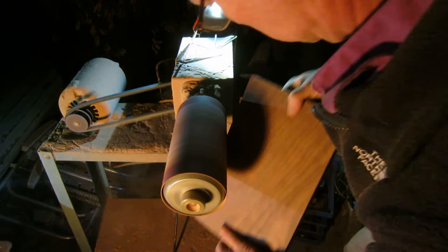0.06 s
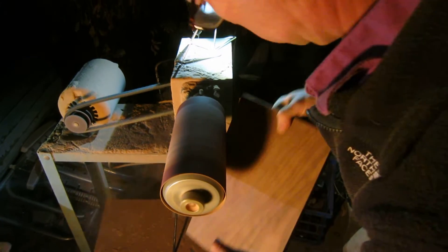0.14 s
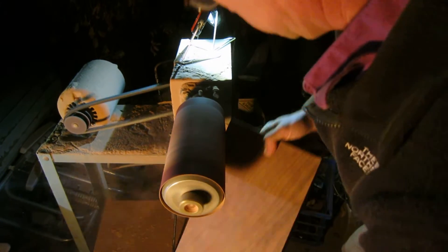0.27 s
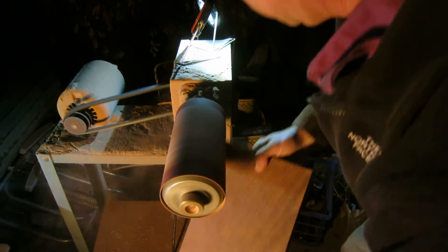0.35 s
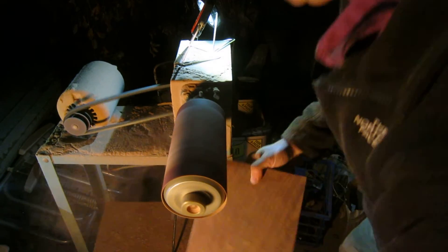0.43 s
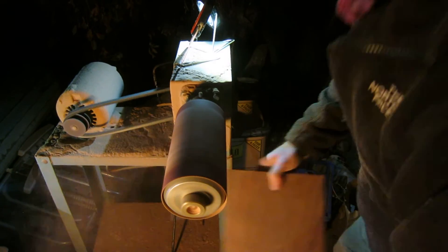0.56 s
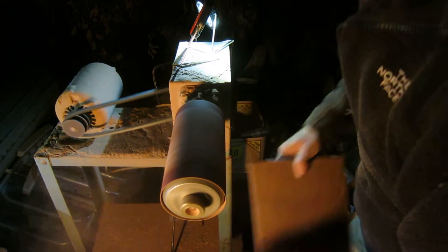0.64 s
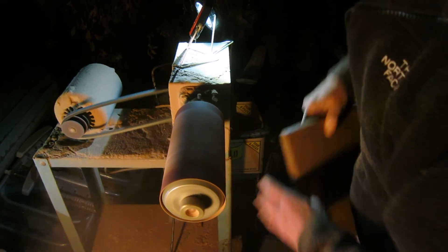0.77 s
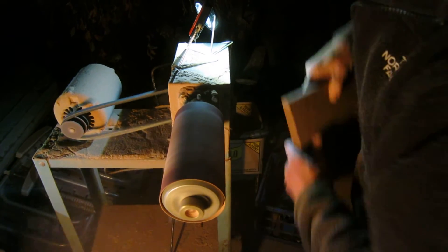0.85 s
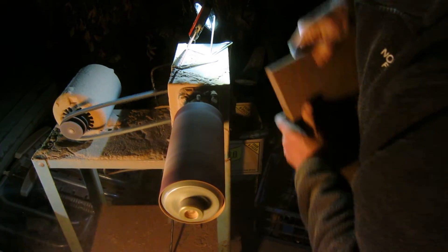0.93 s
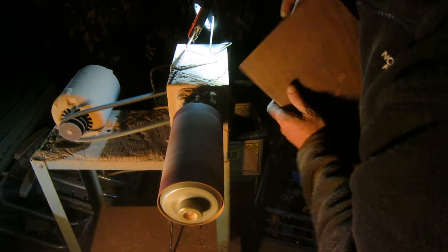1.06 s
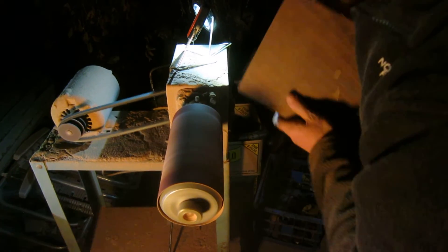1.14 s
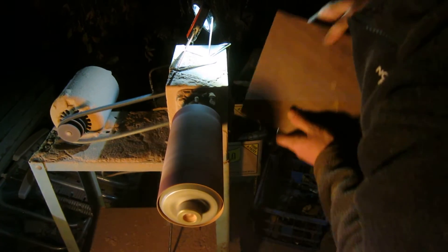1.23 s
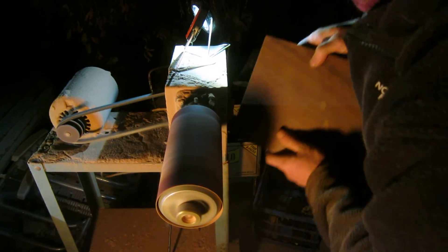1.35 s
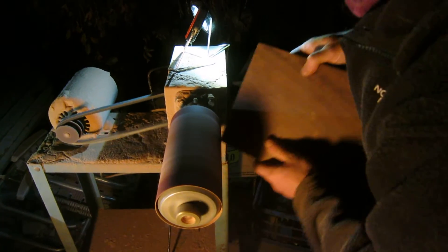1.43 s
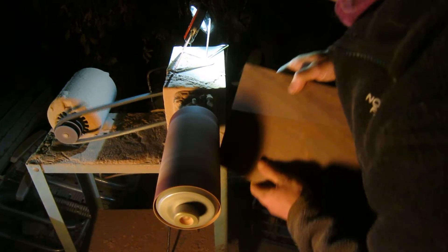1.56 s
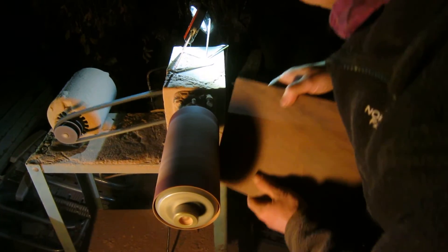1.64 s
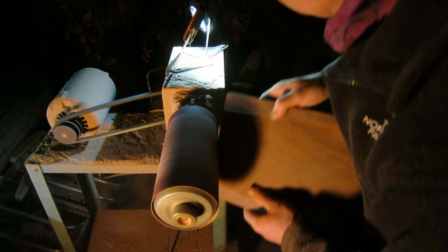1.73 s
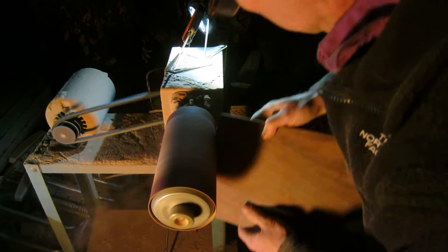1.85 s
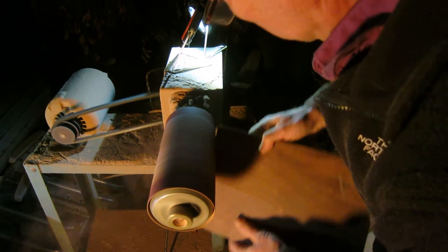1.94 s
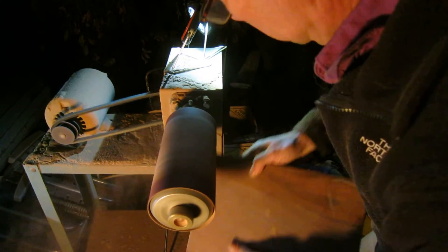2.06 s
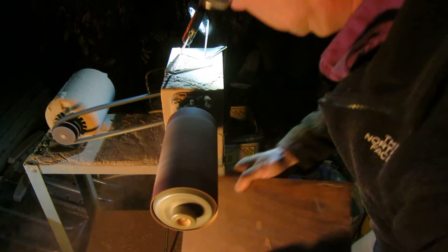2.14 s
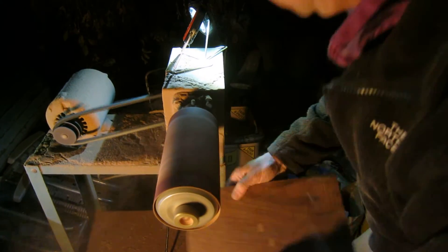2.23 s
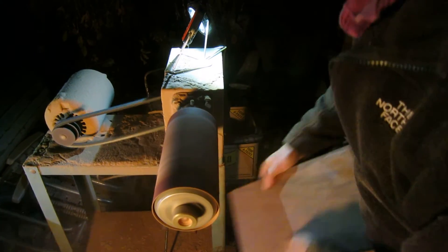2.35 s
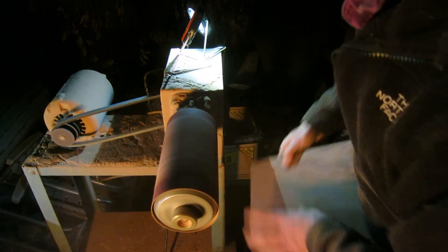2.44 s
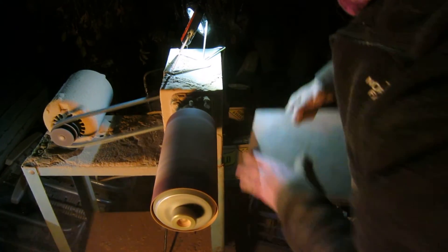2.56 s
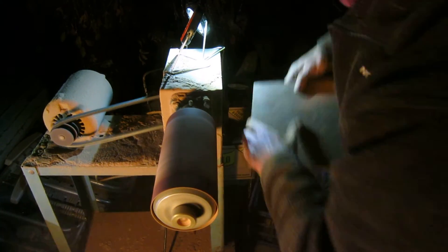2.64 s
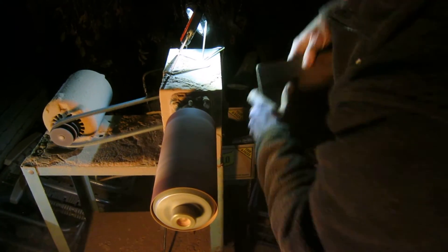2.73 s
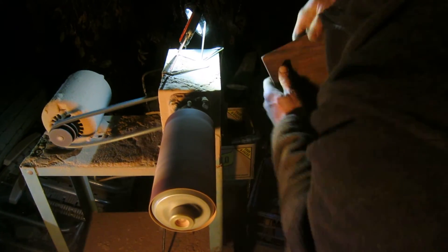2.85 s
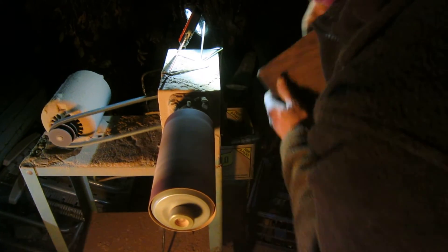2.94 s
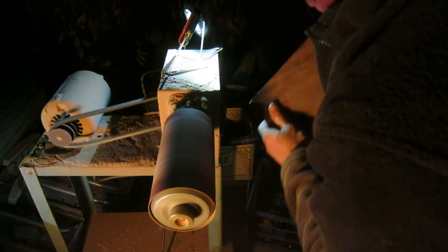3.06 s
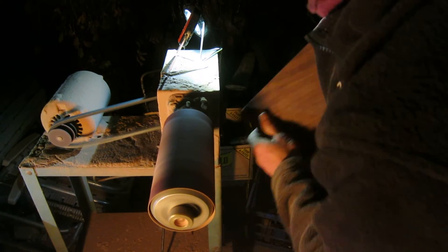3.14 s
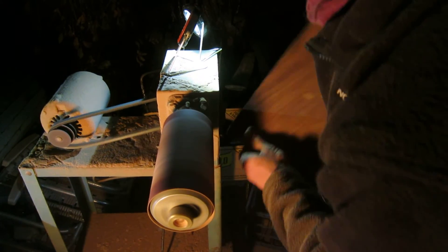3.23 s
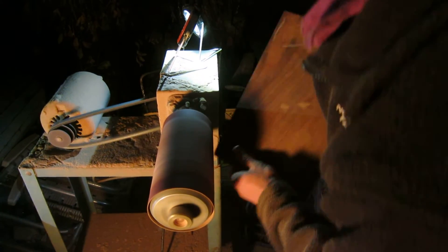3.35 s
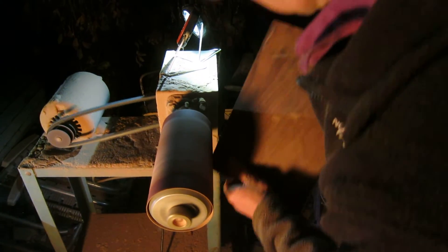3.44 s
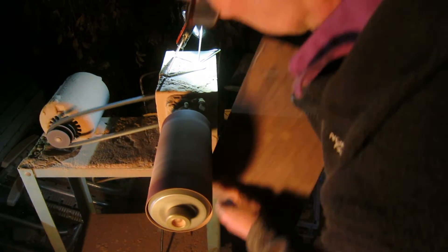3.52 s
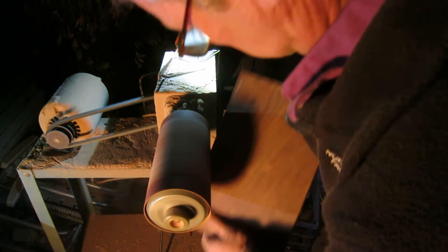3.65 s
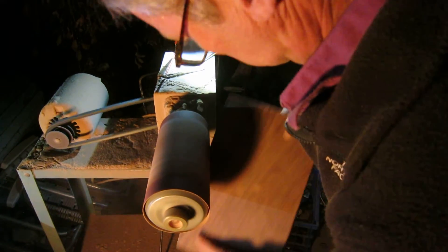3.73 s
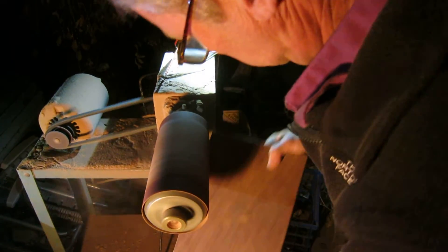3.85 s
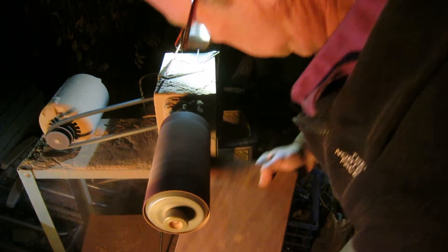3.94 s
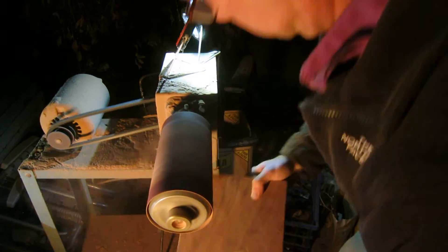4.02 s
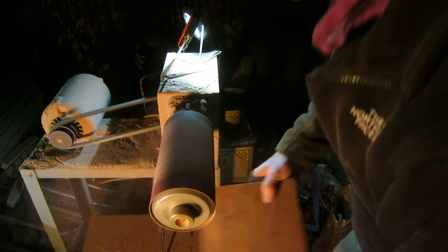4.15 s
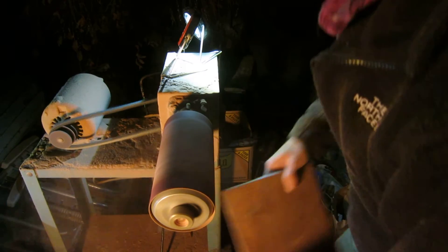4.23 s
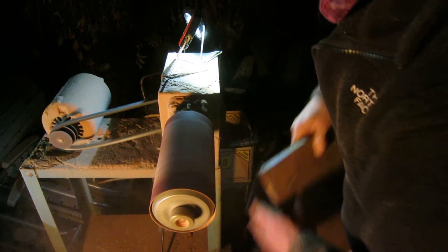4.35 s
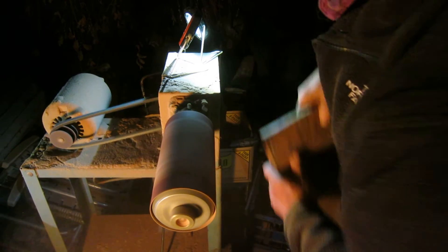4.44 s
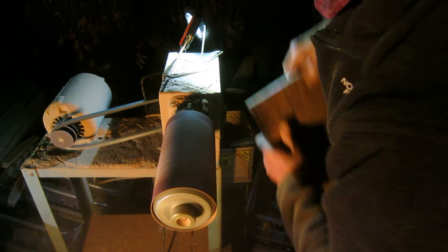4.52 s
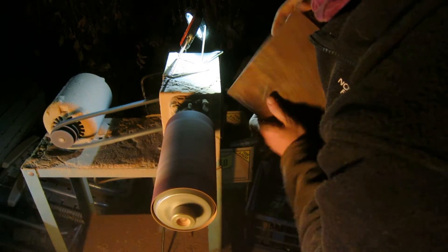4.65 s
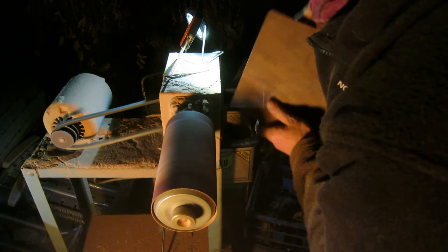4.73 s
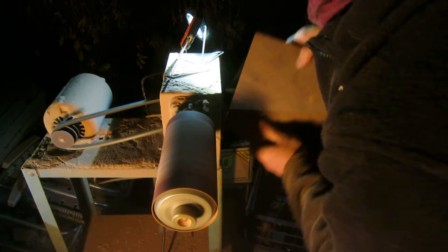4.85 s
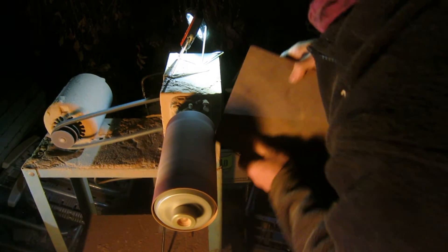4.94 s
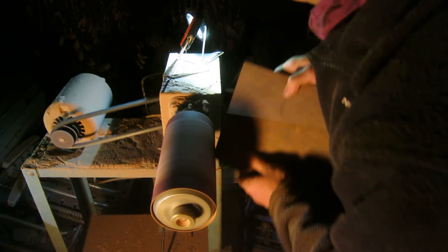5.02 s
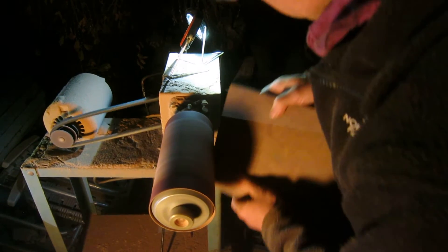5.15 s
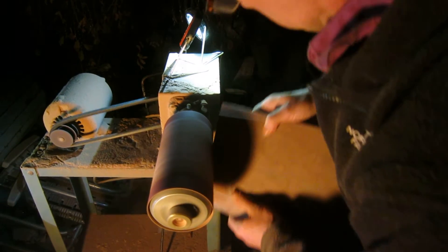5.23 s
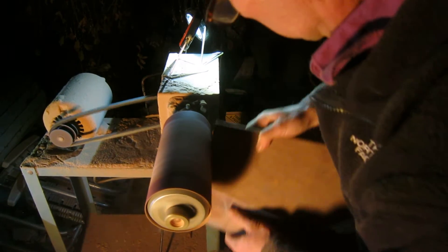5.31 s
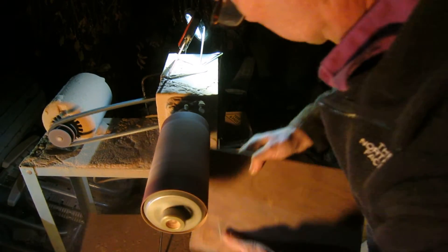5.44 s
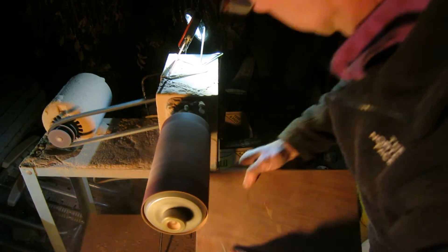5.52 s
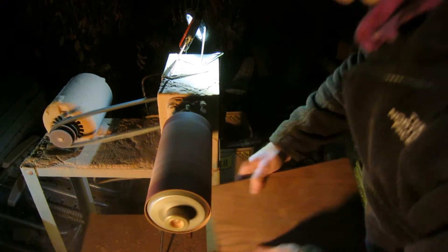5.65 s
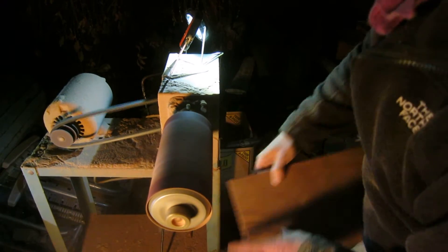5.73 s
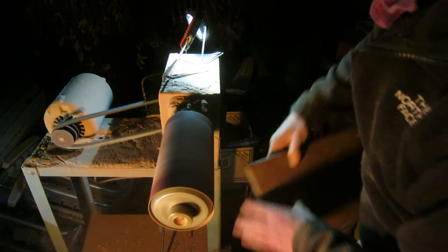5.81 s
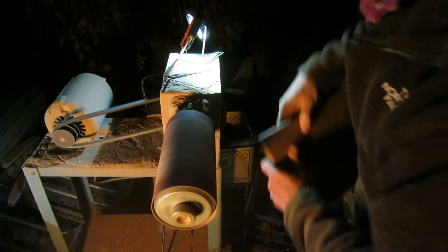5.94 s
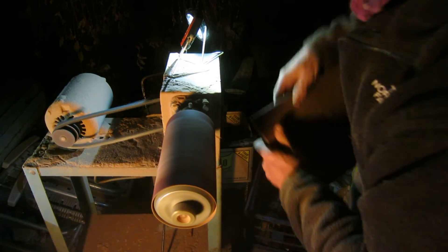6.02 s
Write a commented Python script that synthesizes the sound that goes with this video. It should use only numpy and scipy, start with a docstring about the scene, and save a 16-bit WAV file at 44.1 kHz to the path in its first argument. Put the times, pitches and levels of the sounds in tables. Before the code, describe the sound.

A wooden board is repeatedly pushed along a spinning abrasive drum. Four loud, coarse, hissing rasps judder and fade quickly as the edge slides away, sometimes with a short woody squeak. Much quieter machine noise continues throughout: irregular metallic rattling, belt whirr, low motor hum and scattered clicks. Heard close, outdoors and dry, almost mono with slight width in the treble.

```python
"""Four harsh, gritty strokes and a few brief touches over an uneven rattle, whirr, hum and ticks.
A board is pressed against a belt-driven sanding drum on a steel stand, outdoors.
Random grit clicks drive the board's wood modes and a hiss; knocks and noise ring the stand's resonances.
Filtered noise makes whirr and ticks; sines make hum.
The recorder, with two ports, turns its gain down while the sound is loud."""
import sys
import numpy as np
from scipy import signal
from scipy.fft import rfft, irfft, next_fast_len
from scipy.io import wavfile
from scipy.ndimage import uniform_filter1d

SR = 44100
rng = np.random.default_rng(int(sys.argv[2]) if len(sys.argv) > 2 else 0)


def put_to_file(sound):
    """Save the sound as 16-bit audio at rate SR, in the file named by the first command-line argument."""
    columns = np.atleast_2d(sound).T  # one column per channel
    safe = np.clip(columns, -1, 1)
    whole_steps = np.round(safe * 32767)
    wavfile.write(sys.argv[1], SR, whole_steps.astype(np.int16))


N = 268168

# Strokes of the board along the drum, one list each.
# Each row: time in seconds, pressure as rasp level in dB, brightest band in Hz.
STROKES = [
    [(0.0, -18, 4800), (0.172, -15.5, 4750), (0.356, -16, 4540), (0.4, -23, 4450), (0.44, -31.5, 5060),
     (0.453, -40, 4980)],
    [(1.522, -21, 5320), (1.538, -16, 5250), (1.74, -16.5, 5060), (1.776, -16, 4530), (1.926, -15, 4400),
     (2.024, -15, 4770), (2.068, -18.5, 4300), (2.114, -27.5, 4340), (2.136, -29, 4700), (2.166, -36, 4810),
     (2.18, -59, 4660)],
    [(3.388, -25, 4890), (3.396, -24.5, 4740), (3.454, -24.5, 5090), (3.472, -16.5, 5200),
     (3.72, -15.5, 5010), (3.87, -14, 4580), (3.96, -15.5, 3800), (4.002, -29.5, 3720),
     (4.032, -32.5, 4300), (4.08, -39.5, 4030), (4.092, -57, 3930)],
    [(5.028, -29, 5150), (5.038, -21.5, 5050), (5.126, -15, 4970), (5.214, -15, 5100), (5.356, -17.5, 4050),
     (5.42, -15.5, 4310), (5.496, -21, 4240), (5.528, -30, 4610), (5.548, -52, 4890), (5.552, -44, 4830)],
]
# Tone of each stroke. Each row: added sizzle in dB, added body in dB.
STROKE_COLOUR = [(-2.5, 0), (1, 0.7), (-0.8, 0.8), (-0.5, 1.5)]
# Brief touches as the board bounces on or off the drum.
# Each row: start in seconds, length in seconds, rasp level in dB, final fade in dB.
TOUCHES = [(0.453, 0.034, -34.5, 8), (1.431, 0.018, -37, 12), (1.462, 0.054, -21.5, 10),
           (4.951, 0.056, -25, 5), (5.552, 0.025, -41, 8)]
# Effect of pressure: lighter contact has lower body modes; relative hiss peaks at medium-light
# pressure, relative body when lighter still.
# Each row: rasp level in dB, body re rasp in dB, sizzle re rasp in dB, loudest body mode in Hz.
BY_PRESSURE = [(-61, -7, -18, 490), (-40.5, 1, -11, 570), (-23, -3.5, -1.5, 770), (-19.5, -10.5, -8, 1240),
               (-11, -13, -8.5, 1330)]
# Spectra of the grit driving the upper and lower wood modes, and of the hiss of the finest grains.
# Each row: frequency in Hz, relative density in dB per Hz.
RASP_SPECTRUM = [(1180, -39), (2000, -19), (2390, -43), (2630, -3), (3310, 1), (4480, -5.5), (5030, -2),
                 (5520, -1.5), (6310, -2), (7120, -2), (8000, -9), (10400, -4), (17600, -120)]
BODY_SPECTRUM = [(420, -40), (600, -5.5), (750, 1.5), (1200, 1), (1600, 2), (2000, 2), (2600, 9),
                 (3400, -17)]
SIZZLE_SPECTRUM = [(3650, -31), (6200, -6.5), (7110, 1), (10700, -4.5), (14600, -16), (15300, -24),
                   (15800, -36)]
# Board modes that sing out for a moment, mostly as the edge slides off.
# Each row: start in seconds, end in seconds, frequency in Hz, level in dB.
SINGING = [(0.33, 0.458, 1860, -33.5), (1.46, 1.496, 2350, -26.5), (1.57, 1.62, 3000, -29),
           (2.034, 2.07, 3350, -23), (3.448, 3.586, 2840, -25), (3.622, 3.81, 2330, -30),
           (3.913, 3.992, 1050, -30.5), (3.892, 3.993, 3580, -17), (4.966, 5.002, 1123, -27.5),
           (5.429, 5.465, 737, -32), (5.516, 5.628, 876, -35)]
# Resonances of stand, drum and motor case.
# Each row: frequency in Hz, width in Hz, relative level in dB.
STAND_MODES = [(89.8, 6.5, -11), (157.7, 13.7, -8.5), (224, 19, -8), (312.3, 25, 1.5), (421.5, 36, -2.5),
               (547, 26, -7.5), (617.4, 22, -4), (776, 64, -4.5), (890, 51, -8), (1163, 47, -5.5),
               (1271, 41, -6), (1398, 41, -4.5), (2270, 164, -16.5), (2593, 60, -9.5), (3960, 110, -23.5),
               (4750, 78, -20), (6900, 160, -30.5)]
# Broad noise of belt, bearings and air. Each row: frequency in Hz, relative density in dB per Hz.
WHIRR_SPECTRUM = [(18, -57), (30, -20), (90, -5.5), (307, 0.5), (787, -3.5), (996, -7), (1230, 0),
                  (1770, -15.5), (2620, -8), (3150, -13.5), (6890, -17.5), (11600, -32), (15500, -58)]
# Uneven shaking of the stand. Each row: time in seconds, level in dB.
SHAKING = [(0.0, -38), (0.46, -43), (0.52, -38.5), (1.32, -37.5), (1.49, -34.5), (1.81, -42), (2.13, -41),
           (2.37, -38.5), (2.81, -37.5), (3.35, -35.5), (3.93, -43), (4.25, -39), (5.1, -37.5), (5.42, -43),
           (5.89, -37), (6.08, -38.5)]
# Tones of shaft and motor. Each row: frequency in Hz, mean unloaded level in dB.
HUM = [(91, -59), (120, -53), (240, -56.5)]
# Loudest ticks of belt and handled board. Each row: time in seconds, nominal peak in dB.
TICKS = [(0.871, -30), (1.0535, -32), (2.6655, -30), (2.8105, -30), (2.877, -30), (3.0397, -25.5),
         (3.3044, -29), (3.325, -28), (3.348, -24), (4.2675, -31), (4.8607, -25), (5.5962, -29)]
# Spectrum of a tick. Each row: frequency in Hz, relative density in dB per Hz.
TICK_SPECTRUM = [(1200, -44.5), (3000, -4), (5500, -2.5), (10000, -13.5), (15000, -61.0)]
# Difference between the ports. Each row: frequency in Hz, gain re direct sound in dB.
SANDING_SIDE = [(500, -21), (850, -44), (1350, -27), (2300, -53), (3200, -47), (4100, -33), (5000, -22.5),
                (8000, -12), (14000, -14)]
MACHINE_SIDE = [(40, -30), (120, -17.5), (350, -30.5), (900, -25.5), (1700, -11.5), (2500, -22),
                (4000, -20), (8000, -7), (14000, -11)]
# Resonances of the left port alone. Each row: frequency in Hz, width in Hz, share added (no unit).
LEFT_PORT = [(1305, 73, -0.33), (7300, 4900, -0.26), (10000, 4500, 0.67)]

TOUCH_PEAK_HZ, TOUCH_HOLD_SHARE = 4660, 0.65   # share of a touch before it fades
KNOCKS_PER_S = 300
RATTLE_DB, WHIRR_DB, HUM_LOAD_DB = 4.5, -1, 7   # rattle, whirr re shaking; hum rise at full load
# The middle modes of the stand thin out under load, a little late.
MIDDLE_HZ, MIDDLE_WIDTH_HZ, MIDDLE_LAG_S = 510, 145, 0.052
MIDDLE_IDLE_DB, MIDDLE_LOSS_DB, MIDDLE_WAVER_DB = 2, 12, 3
FAINT_TICKS_PER_S, FAINT_TICK_DB = 8.0, -33.5
TICK_CREST_DB = 8   # peak of a puff over its rms
MACHINE_LEFT_LEAD_SAMPLES = 0.19   # half the lead of the left port
GAIN_KNEE_DB, GAIN_SLOPE, GAIN_START_DB = -22, 0.37, 0
GAIN_ATTACK_S, GAIN_RELEASE_DB_PER_S = 0.45, 51
CUTOFF_HZ = 16400


def sanding(rasp_gain, body_gain, sizzle_gain, peak_hz, body_hz):
    """Thousands of grains a second catch the fibres, in uneven bursts as the board judders."""
    judder = from_db(0.78 * drift(38.0) + 0.16 * drift(15.0))
    # independent grit clicks sharing one judder
    grit = np.array([clicks(per_s=14000, spread_db=0.0) * judder for row in range(4)])
    rasp = board(colour(grit[:2], RASP_SPECTRUM), 2046, 7970, count=26, sharpness=6.4,
                 patchy_db=1.3, peak_hz=peak_hz, peak_db=7.5, peak_width=0.26)
    body = board(colour(grit[2:], BODY_SPECTRUM), 650, 2455, count=16, sharpness=18.4,
                 patchy_db=2.5, peak_hz=body_hz, peak_db=4.5, peak_width=0.5)
    # the finest grains hiss without ringing the wood
    sizzle = rms_one(colour(grit[2], SIZZLE_SPECTRUM))
    contact = rasp_gain * rasp + body_gain * body + sizzle_gain * sizzle
    return contact + singing(grit[3])


def contact_controls():
    """Pressure sets level and colour sample by sample; gains are zero while the board is off the drum."""
    t = np.arange(N) / SR
    rasp_gain, body_gain, sizzle_gain = np.zeros((3, N))
    peak_hz, body_hz = np.full((2, N), 1000.0)   # idle values, unheard
    touches = []
    for start_s, length_s, db, fade_db in TOUCHES:
        touches.append([(start_s, db, TOUCH_PEAK_HZ),
                        (start_s + TOUCH_HOLD_SHARE * length_s, db, TOUCH_PEAK_HZ),
                        (start_s + length_s, db - fade_db, TOUCH_PEAK_HZ)])
    colours = STROKE_COLOUR + [(0, 0)] * len(touches)
    law_db, law_body_db, law_sizzle_db, law_body_hz = np.transpose(BY_PRESSURE)
    for rows, (treble_db, boom_db) in zip(STROKES + touches, colours):
        s, rasp_db, band_hz = np.transpose(rows)
        under_way = 99 * (s[0] < .1)   # a stroke starting before 0.1 s has no onset ramp
        onset = np.clip((t - s[0]) / .003 + under_way, 0, 1)
        contact = onset * np.clip((s[-1] - t) / .006, 0, 1)
        level_db = np.interp(t, s, rasp_db)
        body_db = level_db + np.interp(level_db, law_db, law_body_db) + boom_db
        sizzle_db = level_db + np.interp(level_db, law_db, law_sizzle_db) + treble_db
        rasp_gain += contact * from_db(level_db)
        body_gain += contact * from_db(body_db)
        sizzle_gain += contact * from_db(sizzle_db)
        peak_hz = np.where(contact > 0, np.interp(t, s, band_hz), peak_hz)
        body_hz = np.where(contact > 0, np.interp(level_db, law_db, law_body_hz), body_hz)
    return rasp_gain, body_gain, sizzle_gain, peak_hz, body_hz


def board(grit, low_hz, high_hz, count, sharpness, patchy_db, peak_hz, peak_db, peak_width):
    """Short wood modes swell and fade as the contact line travels; those near peak_hz are driven harder."""
    out = 0
    for k, hz in enumerate(np.geomspace(low_hz, high_hz, count)):
        nearness = np.exp(-(np.log(hz / peak_hz) / peak_width) ** 2)
        gain_db = patchy_db * drift(4.5) + peak_db * nearness
        mode = resonance(grit[k % 2], hz, hz / sharpness)   # neighbouring modes take different click rows
        out = out + (-1) ** (k // 2) * from_db(gain_db) * mode
    # level out slow swings: pressure sets the loudness
    return out / np.sqrt(uniform_filter1d(out ** 2, size=5000) + 1e-9)


def singing(grit):
    """A narrow mode swells and fades under grit with the same judder."""
    t, out = np.arange(N) / SR, 0
    for start_s, end_s, hz, db in SINGING:
        swell = np.sin(np.pi * np.clip((t - start_s) / (end_s - start_s), 0, 1))
        width_hz = hz / 16.4
        mode = resonance(resonance(grit, hz, width_hz), hz, width_hz)
        out = out + from_db(db) * swell * rms_one(mode)
    return out


def machine(load):
    """Soft irregular knocks and noise ring the stand, with a broad whirr; load raises the hum."""
    s, shake_db = np.transpose(SHAKING)
    t = np.arange(N) / SR
    drive = clicks(KNOCKS_PER_S, spread_db=-1.5) + 1.27 * rng.standard_normal(N)
    drive = drive * from_db(1.02 * drift(58.0))
    rattle = 0
    for k, (hz, width_hz, db) in enumerate(STAND_MODES):
        mode_gain = from_db(db + 2.03 * drift(2.1))
        rattle = rattle + (-1) ** k * mode_gain * resonance(drive, hz, width_hz)
    whirr = rms_one(colour(rng.standard_normal(N), WHIRR_SPECTRUM))
    whirr = whirr * from_db(WHIRR_DB + 1.0 * drift(29.0))
    stand = from_db(RATTLE_DB) * rms_one(rattle) + whirr

    r = np.exp(-1 / (MIDDLE_LAG_S * SR))
    late_load = signal.lfilter([1 - r], [1, -r], load, zi=[r * load[0]])[0]
    middle_db = MIDDLE_IDLE_DB - MIDDLE_LOSS_DB * late_load + MIDDLE_WAVER_DB * drift(3.2)
    stand = stand + (from_db(middle_db) - 1) * resonance(stand, MIDDLE_HZ, MIDDLE_WIDTH_HZ)

    hum = sum(np.sqrt(2) * from_db(db) * np.sin(2 * np.pi * hz * t) for hz, db in HUM)
    hum = hum * from_db(HUM_LOAD_DB * load + 0.33 * drift(7.6))
    return stand * from_db(np.interp(t, s, shake_db)) + hum


def ticks():
    """Each tick is a bright puff of noise falling 60 dB in 35 ms; faint ones come at random."""
    s, peak_db = np.transpose(TICKS)
    faint = rng.random(N) < FAINT_TICKS_PER_S / SR
    starts = faint * from_db(FAINT_TICK_DB + 2.0 * rng.standard_normal(N)) + 1e-18
    starts[(s * SR).astype(int)] = from_db(peak_db)
    dying = signal.lfilter([1], [1, -from_db(-60 / (0.035 * SR))], starts)
    puff = colour(rng.standard_normal(N), TICK_SPECTRUM)
    return dying * rms_one(puff) * from_db(-TICK_CREST_DB)


def diffuse(x, points):
    """Diffuse stereo part of the sound: its phase differs by band and wanders."""
    size = next_fast_len(N)
    band_phase = rng.uniform(0, 2 * np.pi, 121)
    phase = np.interp(np.linspace(0, 120, size // 2 + 1), np.arange(121), band_phase)
    analytic = signal.hilbert(irfft(rfft(x, size) * np.exp(1j * phase), size))[:N]
    wandering = np.real(analytic * np.exp(1j * np.pi * drift(18.0)))
    return colour(wandering, points)


def from_db(db):
    """Decibels to gain."""
    return 10 ** (np.asarray(db) / 20)


def rms_one(x):
    """Scale to rms 1."""
    return x / np.sqrt(np.mean(x ** 2) + 1e-20)


def colour(x, points):
    """Filter by a spectrum of (Hz, dB) points, held flat beyond its ends."""
    size = next_fast_len(N + 4096)
    hz, db = np.transpose(points)
    log_hz = np.log(np.maximum(np.arange(size // 2 + 1) * SR / size, 1))
    gain = from_db(np.interp(log_hz, np.log(hz), db))
    return irfft(rfft(x, size) * gain, size)[..., :N]


def drift(rate):
    """Slow chance of spread 1 that changes about rate times a second."""
    r = np.exp(-80 * np.pi * rate / SR)   # one step is 40 samples
    noise = rng.standard_normal(N // 40 + 2002)
    slow = signal.lfilter([1], [1, -2 * r, r * r], noise)[2000:]   # drop the run-in
    return np.interp(np.arange(N) / 40, np.arange(len(slow)), rms_one(slow))


def clicks(per_s, spread_db):
    """Random clicks of either sign, uneven in size unless spread_db is 0."""
    sizes = from_db(spread_db * np.minimum(rng.exponential(1, N), 4))
    signs = rng.choice([-1, 1], N)
    return rms_one(sizes * signs * (rng.random(N) < per_s / SR))


def resonance(x, hz, width_hz):
    """Two-pole resonance with gain 1 on top."""
    r = np.exp(-np.pi * width_hz / SR)
    zeros = np.array([1, 0, -1]) * (1 - r * r) / 2
    poles = [1, -2 * r * np.cos(2 * np.pi * hz / SR), r * r]
    return signal.lfilter(zeros, poles, x)


def scene():
    """All sources reach both ports almost alike; the diffuse part has opposite signs at the two."""
    controls = contact_controls()
    load = np.clip(uniform_filter1d(controls[0], size=6000) / from_db(-9.5), 0, 1)
    rubbing = sanding(*controls)
    running = machine(load) + ticks()
    side = diffuse(rubbing, SANDING_SIDE) + diffuse(running, MACHINE_SIDE)
    side = side + MACHINE_LEFT_LEAD_SAMPLES * np.gradient(running)   # the motor stands to the left
    left = rubbing + running + side
    left = left + sum(share * resonance(left, hz, width_hz) for hz, width_hz, share in LEFT_PORT)
    right = rubbing + running - side
    return np.array([left, right])


def record(dry):
    """Slow gain control on loud passages, then the top is cut."""
    power = uniform_filter1d(np.mean(dry ** 2, axis=0), size=1000)
    level_db = 10 * np.log10(power + 1e-12)
    fall_db = GAIN_RELEASE_DB_PER_S * np.arange(N) / SR
    held_db = np.maximum.accumulate(level_db + fall_db) - fall_db   # peaks held, falling steadily
    wanted_db = -GAIN_SLOPE * np.maximum(held_db - GAIN_KNEE_DB, 0)
    r = np.exp(-1 / (GAIN_ATTACK_S * SR))
    gain_db = signal.lfilter([1 - r], [1, -r], wanted_db, zi=[r * GAIN_START_DB])[0]
    top_cut = signal.cheby2(16, 90, CUTOFF_HZ, fs=SR, output="sos")
    return signal.sosfilt(top_cut, dry * from_db(gain_db))


dry = scene()
out = record(dry)
put_to_file(out)
```